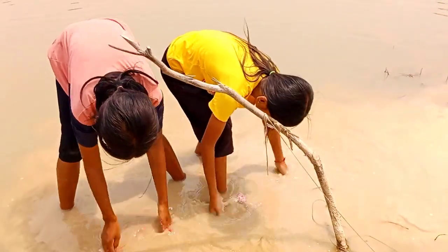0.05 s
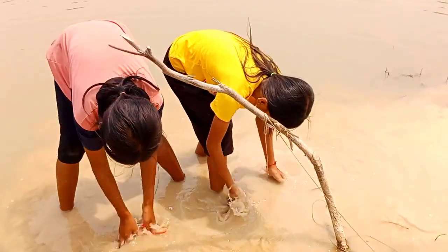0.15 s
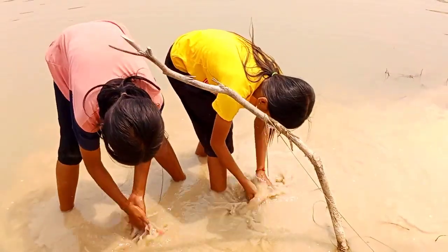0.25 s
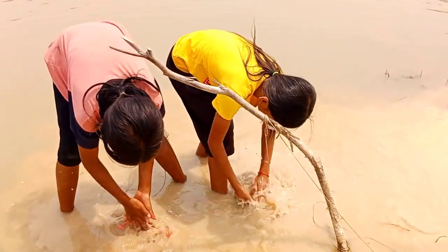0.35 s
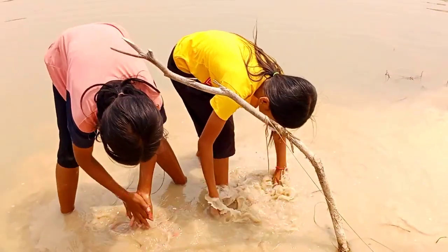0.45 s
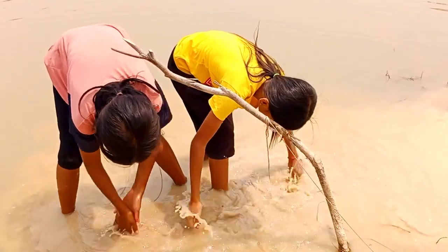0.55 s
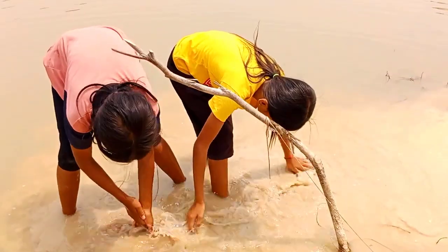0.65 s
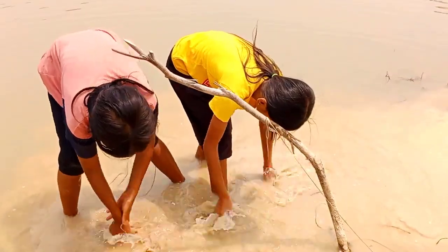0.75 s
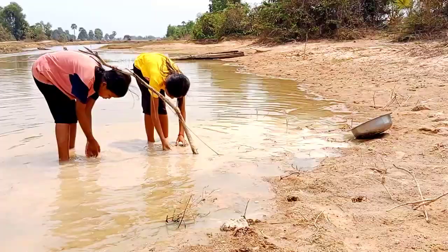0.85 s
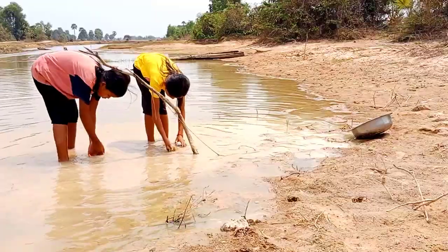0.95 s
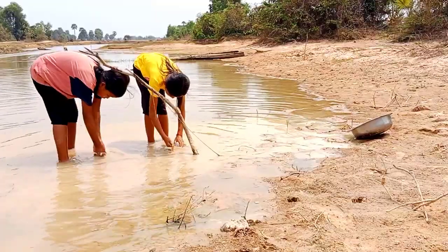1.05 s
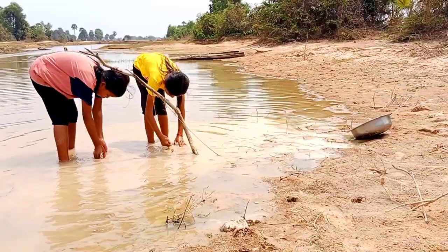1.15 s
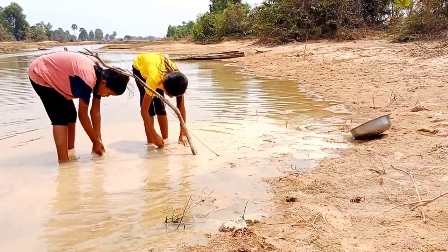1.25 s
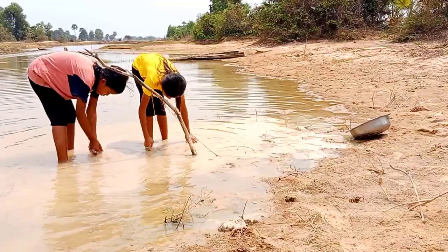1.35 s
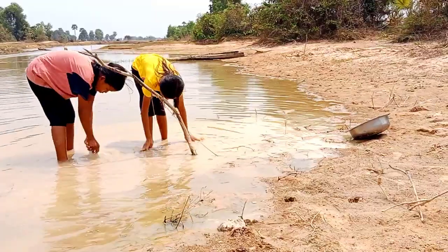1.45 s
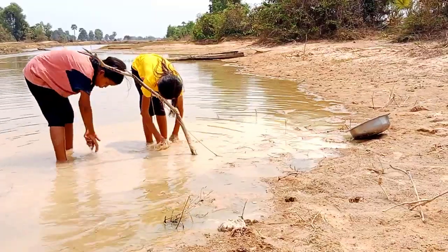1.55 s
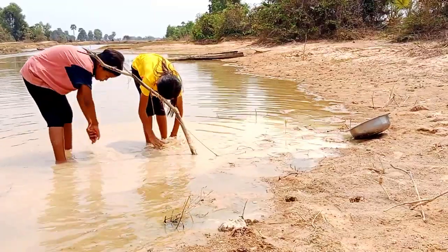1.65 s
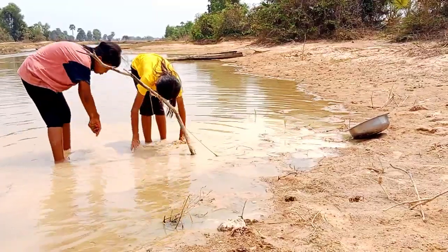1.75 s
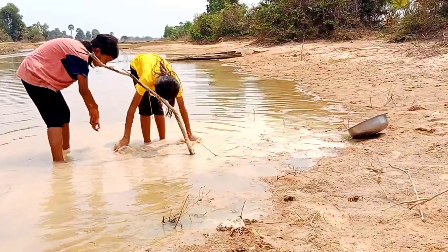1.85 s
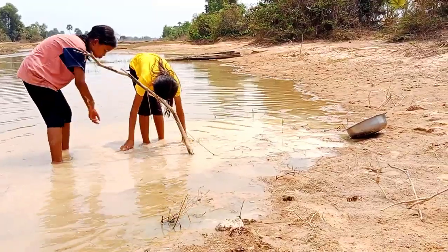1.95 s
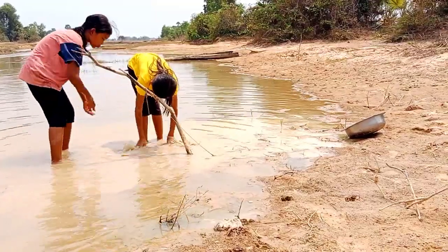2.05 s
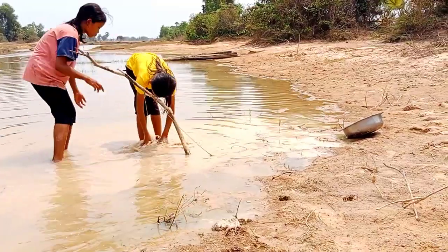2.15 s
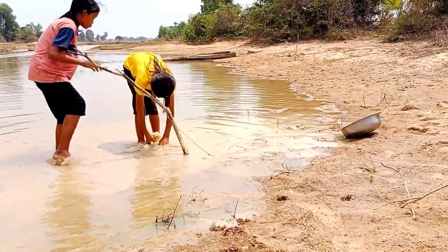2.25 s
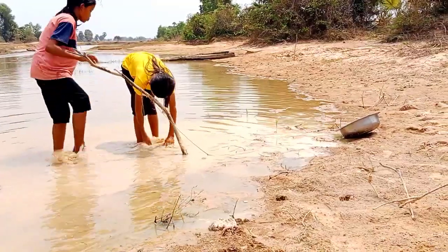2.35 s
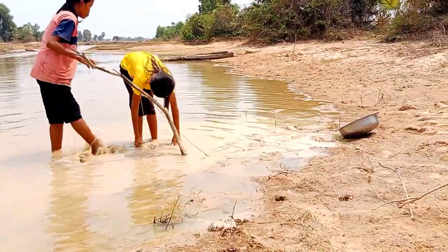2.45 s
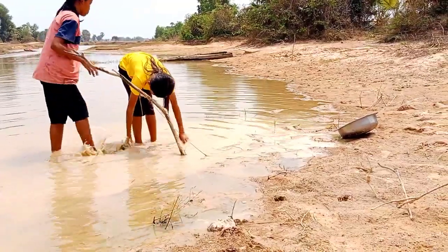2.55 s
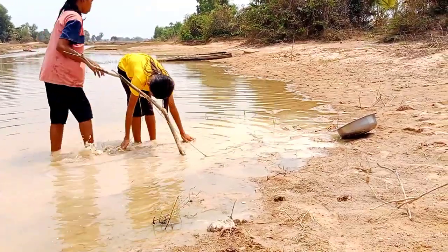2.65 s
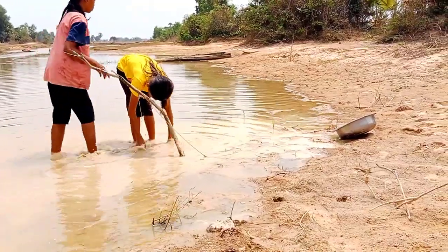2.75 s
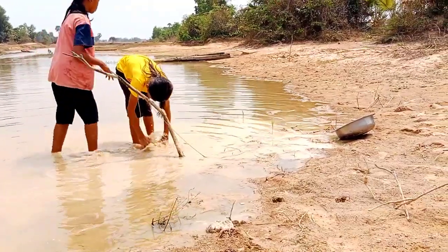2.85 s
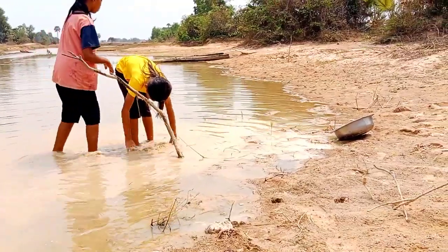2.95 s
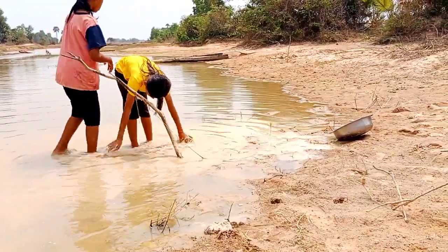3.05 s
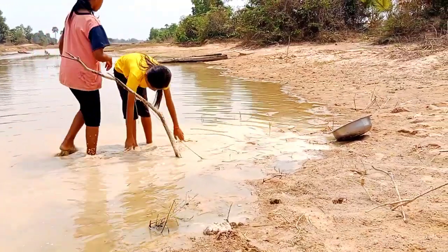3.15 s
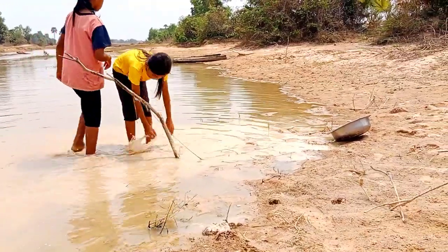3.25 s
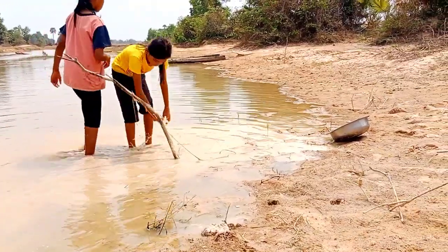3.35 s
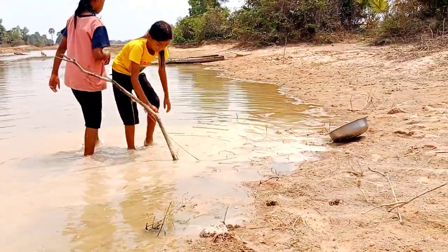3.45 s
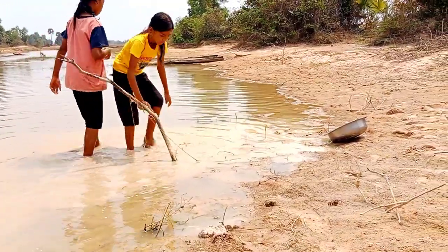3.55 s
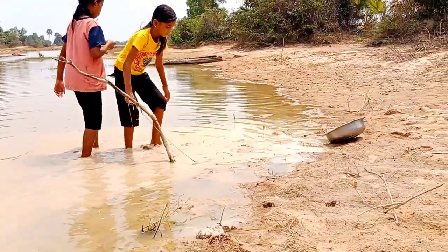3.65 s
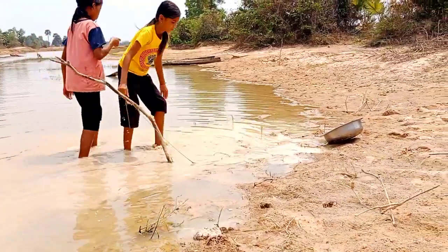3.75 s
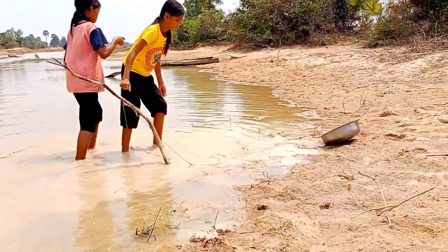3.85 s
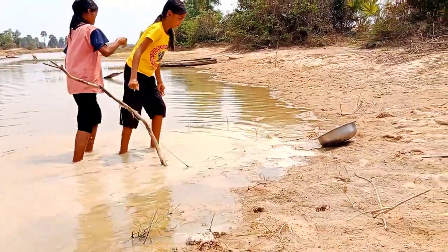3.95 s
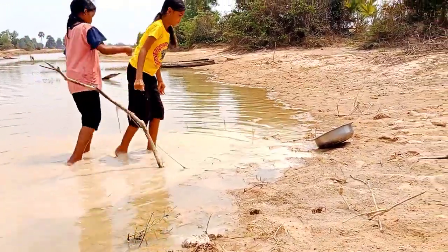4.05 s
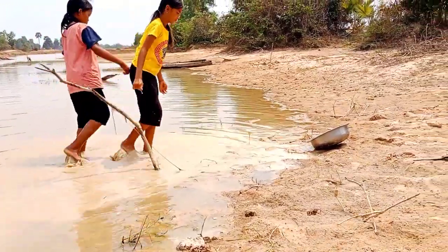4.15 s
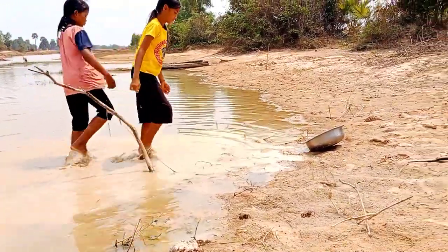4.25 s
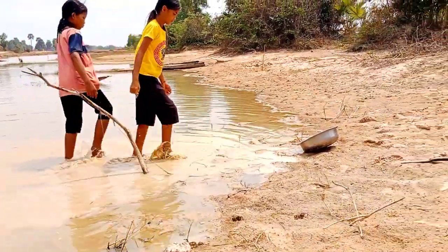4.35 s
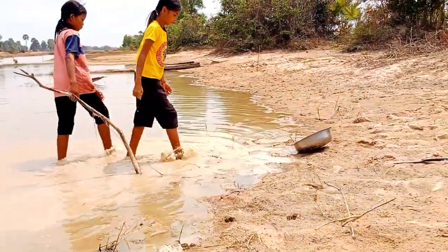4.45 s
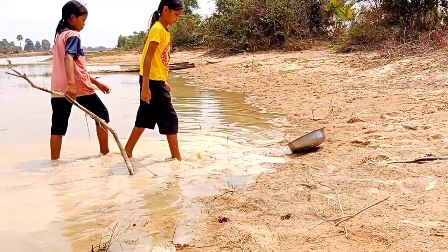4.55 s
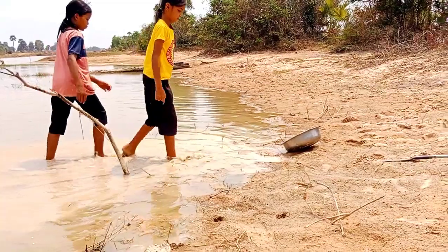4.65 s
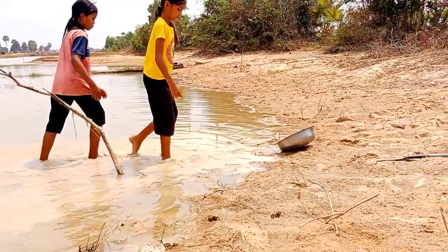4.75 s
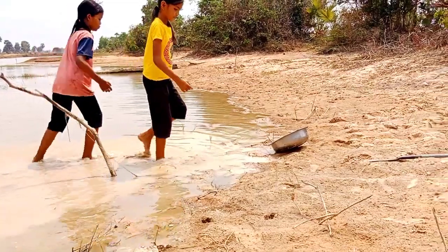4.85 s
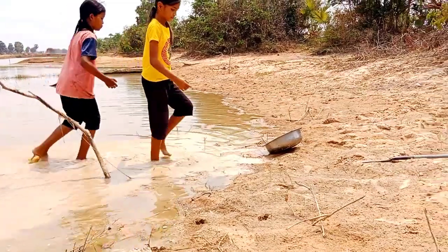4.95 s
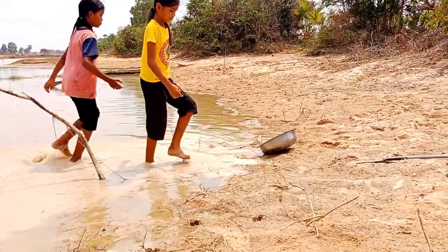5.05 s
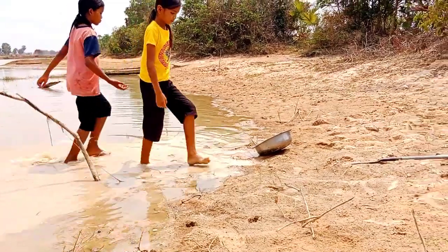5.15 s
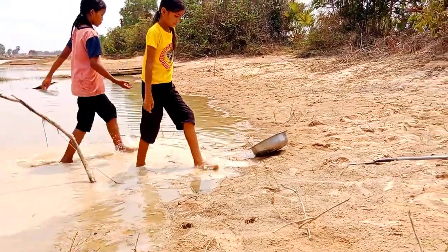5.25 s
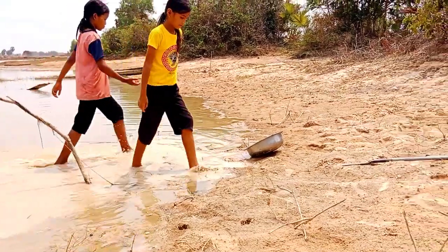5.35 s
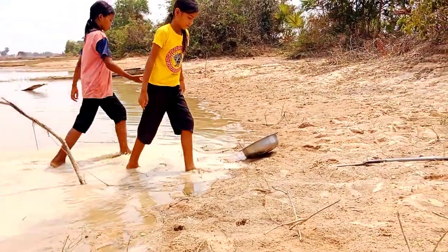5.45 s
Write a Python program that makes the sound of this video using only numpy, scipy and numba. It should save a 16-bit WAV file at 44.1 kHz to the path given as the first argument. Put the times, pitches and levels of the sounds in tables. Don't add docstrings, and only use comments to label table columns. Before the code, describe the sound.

Close bubbly splashing stops dead, then quieter sloshing around shifting feet, abrupt wind bumps on the microphone and a few watery steps.

```python
import sys
import numpy as np
from scipy import signal
from scipy.fft import rfft, irfft, next_fast_len
from scipy.io import wavfile
from scipy.ndimage import uniform_filter1d
from numba import njit

SR = 44100
rng = np.random.default_rng(int(sys.argv[2]) if len(sys.argv) > 2 else 0)


def unload_wav(signal):
    wavfile.write(
        sys.argv[1],
        SR,
        np.round(np.clip(np.atleast_2d(signal).T, -1, 1) * 32767).astype(np.int16),
    )


def to_linear_factor(level_db):
    exponent = np.asarray(level_db, float) / 20
    return 10 ** exponent


N = 243278
T = np.arange(N) / SR

# start in seconds, end in seconds.
SILENCE_S = (.8605, .955)

# frequency in Hz, level in dB per Hz.
AIR_COLOUR = [(18, -26.5), (30, 1), (140, -2.5), (210, -21.5), (360, -14.5), (1220, -25), (3580, -25),
              (11700, -38), (16000, -45)]

# frequency in Hz, level in dB per Hz.
WATER_COLOUR = [(280, -29), (400, -17), (600, -4.5), (1170, 4.5), (2200, -6), (3800, -15), (3980, -28.5),
                (4500, -28), (4850, -39), (5500, -24), (7400, -13), (9300, -16.5), (10500, -19.5),
                (13500, -22), (15300, -25.5)]
# peak time in seconds, peak level in dB, rise in seconds per 20 dB,
# fall in seconds per 20 dB, spray in dB above slosh.
SCOOPS = [(0.02, -57.5, 0.12, 0.06, -5.5), (0.071, -36, 0.015, 0.011, -17.5),
          (0.082, -19.5, 0.0042, 0.046, -13.5), (.135, -50, .03, 0.065, -8),
          (0.228, -17, 0.0095, 0.12, -20), (0.311, -18.5, 0.059, 0.085, -8),
          (0.353, -16, 0.13, 0.027, -20.5), (0.413, -25.5, 0.012, 0.081, -13), (.46, -25, .1, 0.12, -8.5),
          (0.669, -24.5, 0.17, 0.034, -10), (.74, -26, 0.033, 0.11, -2), (.81, -24, 0.21, 0.045, -10.5),
          (0.859, -21, 0.056, 0.014, -9)]
SLOSHES = [(1.304, -55.5, 0.0055, 0.15, -10.5), (1.5, -73, 0.24, 0.048, -5.5),
           (1.546, -47.5, 0.079, 0.18, -9.5), (1.804, -38, 0.16, 0.18, -14.5),
           (1.909, -33.5, 0.053, 0.044, -15.5), (2.034, -43, 0.066, 0.054, -9),
           (2.148, -50, 0.0025, 0.38, -8.5), (2.24, -40, 0.072, 0.18, -33),
           (2.39, -45.5, 0.39, 0.065, -22.5), (2.444, -28, 0.011, 0.14, -23.5),
           (2.489, -16, 0.038, 0.099, -19.5), (2.521, -17, 0.064, 0.12, -15.5),
           (2.68, -38.5, 0.35, 0.13, -15.5), (2.739, -38, 0.061, 0.086, -9),
           (2.795, -36.5, 0.14, 0.044, -20), (2.896, -43, 0.1, 0.31, -42), (2.962, -41.5, 0.08, 0.13, -8.5),
           (3.168, -38.5, 0.062, 0.11, -8.5), (3.285, -53, 0.037, 0.17, -7.5),
           (3.489, -43.5, 0.0037, 0.11, -24.5), (3.533, -48.5, 0.073, 0.018, -14.5),
           (3.657, -42, 0.024, 0.039, -15), (3.714, -50, 0.082, 0.11, -13.5),
           (3.83, -52, 0.085, 0.092, -24)]
STRIDES = [(4.107, -53, 0.051, 0.022, -16), (4.15, -68.5, 0.05, 0.066, -4),
           (4.365, -36.5, 0.098, 0.11, -16.5), (4.461, -40, 0.25, 0.19, -10.5),
           (4.51, -33, 0.068, 0.074, -9.5), (4.631, -32, 0.15, 0.043, -11.5), (4.74, -56, 0.1, 0.071, -30),
           (4.802, -49.5, 0.084, 0.048, -15.5), (4.992, -33, 0.0019, 0.2, -15.5),
           (5.032, -29.5, 0.031, 0.017, -18), (5.15, -46.5, 0.097, 0.43, -14),
           (5.202, -43.5, 0.034, 0.1, -1.5), (5.33, -48, 0.48, 0.52, -6), (5.448, -60, 0.55, 0.19, 6)]
# time in seconds, gurgle in dB above slosh.
DEPTH = [(.128, -28), (.29, 1.8), (.41, -13), (.554, 0), (.73, -9.5), (.86, 1.5), (1.4, -26), (1.66, -8.5),
         (1.8, -17), (2.41, -18.5), (2.44, 6), (2.7, -19.5), (3.45, -19.5), (3.52, -7), (4.6, -4),
         (4.75, -28), (5.03, -7.5), (5.2, -16)]
FIZZ_DB = (-2.5, -1.5, 1)
# time in seconds, depth in dB.
CLAMPS = [
    (.358, -10),
    (1.849, -10.5),
    (1.908, -16),
    (2.048, -14),
    (2.306, -12),
    (3.249, -8.5),
    (4.105, -1.5),
    (5.085, -12),
]

# start in seconds, peak level in dB, pitch in Hz, ring time in cycles,
# pitch rise from 0 to 1.
BUBBLES = [(0.033, -44.5, 643, 13, 0), (0.066, -36.5, 647, 15, 0.17), (0.084, -11, 1394, 6.4, 0),
           (0.094, -23.5, 661, 10.4, 0.27), (0.117, -19.5, 1357, 7.9, 0.34), (0.229, -12, 916, 12, 0),
           (0.236, -9.5, 1136, 20, 0.05), (0.287, -17, 1620, 7.9, 0.4), (0.3, -6.5, 392, 9.7, 0.02),
           (0.321, -4.5, 1520, 7.9, 0.14), (0.341, 1, 952, 6.4, 0.33), (0.577, -21.5, 336.4, 13, 0.14),
           (0.612, -27, 415, 14, 0.44), (0.137, -33, 1060, 15, 0.7), (0.005, -55, 640, 14, 0.05),
           (0.638, -21, 596, 7.2, 0.08), (0.752, -21, 956, 6, 0), (0.851, -9.5, 990, 7.6, 0.06)]
FOOT_BUBBLES = [(1.576, -42.5, 564, 16, 0.15), (1.6, -38, 1070, 9.4, 0.06), (1.693, -48, 594, 17, 0),
                (1.81, -16, 1167, 7, 0), (1.835, -23.5, 1470, 9, 0), (2.225, -30.5, 1088, 26, 0.15),
                (2.261, -34, 1090, 13, 0.02), (2.439, -17, 455, 9.2, 0.15), (2.461, -12, 615, 6.9, 0.03),
                (2.473, -6.5, 1013, 18, 0.15), (2.488, -8, 1192, 22, 0.16), (2.508, -15, 1303, 17, 0.41),
                (2.543, -6, 550, 6.6, 0.04), (2.74, -21, 1160, 10.3, 0.02), (2.783, -18, 956, 10, 0.15),
                (2.875, -26, 763, 10.6, 0.03), (3.153, -24.5, 1200, 14.6, 0.19),
                (3.495, -28, 1180, 4.3, 0.08), (3.524, -27, 1182, 8.3, 0.24), (3.708, -32, 1450, 8.7, 0.02),
                (3.804, -42, 796, 11, 0), (3.9, -57.5, 1150, 110, 0.05), (4.124, -54.5, 1150, 45, 0.03),
                (4.15, -55, 900, 34, 0.03), (4.193, -45, 790, 36, 0.19), (4.24, -55.5, 600, 38, 0),
                (4.725, -48, 1200, 35, 0.1), (4.746, -44, 1380, 23, 0.1), (4.763, -44, 1180, 14, 0.03),
                (4.785, -45, 1150, 27, 0.02), (4.895, -62.5, 1200, 38.2, 0.2),
                (4.501, -13.5, 1098, 8, 0.09), (4.55, -28, 549, 13, 0.05), (4.617, -28, 1180, 5.9, 0.6),
                (4.995, -24.5, 1176, 29, 0.3), (5.02, -20, 625, 9.7, 0.01), (5.329, -38.5, 877, 13, 0.06)]
# start in seconds, peak level in dB.
SMACKS = [(.025, -46), (.036, -51), (.08, -21.5), (.411, -26.5), (.463, -26), (.5375, -29), (.579, -17.5),
          (.72, -33.5), (.801, -21.5), (.848, -16.5), (1.883, -34), (3.65, -43.5), (4.105, -27.5),
          (4.618, -30.5), (4.774, -49.5), (4.797, -52.5), (5.361, -44.5)]
# start in seconds, peak level in dB.
DROPS = [(0.0368, -37), (0.0722, -29), (0.0832, -23.5), (0.0899, -13.5), (0.2119, -27.5), (0.2793, -15),
         (0.3247, -10.5), (0.4424, -19), (0.5023, -23), (0.5931, -24), (0.6419, -25), (0.1092, -14),
         (0.232, -15.5), (0.2996, -7), (0.3418, -12.5), (0.423, -23.5), (0.4823, -18.5), (0.5275, -18),
         (0.7036, -21), (0.7344, -10), (0.847, -6), (1.2995, -38.5), (1.8856, -32), (2.1603, -23),
         (1.7963, -38), (1.8287, -44), (2.2578, -46.5), (2.305, -45.5), (2.4543, -34.5), (2.4708, -29),
         (2.4897, -25), (2.6369, -32), (2.9322, -37.5), (2.5233, -19.5), (2.578, -27), (2.6925, -21.5),
         (2.9572, -31.5), (3.1625, -31), (3.31, -46), (3.545, -47.5), (3.6617, -35), (3.722, -50),
         (4.1055, -36), (4.1399, -44.5), (4.165, -50), (4.178, -43), (4.4253, -40), (4.4967, -33),
         (4.565, -32), (4.6314, -18.5), (4.6364, -19.5), (4.657, -32.5), (5.2001, -24), (5.361, -36)]
# start in seconds, peak level in dB, pitch in Hz.
SCOOP_PLIPS = [(0.088, -30, 2470), (0.089, -33.5, 4020), (0.18, -41, 1722), (0.235, -27.0, 2320),
               (0.237, -34, 2880), (0.246, -19, 1960), (0.266, -23.5, 2480), (0.29, -12.5, 1630),
               (0.299, -33, 2487), (0.302, -12, 1226), (0.332, -13, 1870), (0.341, -32, 3890),
               (0.343, -6.5, 1347), (0.417, -26, 1900), (0.421, -22.5, 936), (0.454, -31, 3400),
               (0.478, -22.5, 2140), (0.48, -30, 1700), (0.535, -30.5, 1894), (0.58, -28, 2290),
               (0.719, -22, 2300), (0.725, -21.5, 1570), (0.789, -19.5, 1870), (0.817, -17.5, 960),
               (0.845, -32, 2454), (0.855, -19.5, 696), ]
FOOT_PLIPS = [(1.434, -52.5, 1160), (1.82, -37.5, 2250), (1.842, -43.5, 436), (1.881, -37, 1230),
              (1.885, -32, 985), (1.896, -31, 1510), (1.899, -35, 1810), (1.986, -52.5, 1250),
              (2.148, -39.5, 1260), (2.16, -41, 1190), (2.197, -35, 1119.0), (2.223, -31.5, 860),
              (2.482, -13, 610), (2.485, -32, 3030), (2.49, -27, 2400), (2.501, -30.5, 2770),
              (2.508, -17, 2000), (2.513, -15, 1230), (2.52, -21, 856), (2.529, -17, 1130),
              (2.535, -36, 2920), (2.581, -34, 1528), (2.691, -45, 2430), (2.693, -36, 1990),
              (2.89, -32, 1335), (2.933, -34, 1008), (2.957, -36, 1188), (3.016, -38.5, 2100),
              (3.113, -44.5, 1180), (3.153, -35.5, 1690), (3.182, -40.5, 2497.0), (3.22, -40.5, 1670),
              (3.282, -46.5, 1464.0),
              (3.5, -47.5, 1894.0), (3.582, -48.5, 1200), (3.653, -32, 1220), (3.71, -49.5, 1993),
              (4.103, -40.5, 432), (4.108, -40, 1290), (4.058, -53, 5940), (4.424, -31, 904.0),
              (4.5, -30, 1510), (4.517, -30.5, 2450), (4.616, -27, 1330), (4.617, -31.3, 1630),
              (4.623, -37, 2290), (4.637, -33, 1981.0), (4.773, -48, 3100), (4.774, -48, 2770),
              (4.796, -43.5, 1982), (5.0, -43, 3675), (5.006, -27, 2180), (5.011, -24, 1050),
              (5.015, -38, 3480), (5.027, -35.5, 2830), (5.073, -36.3, 1170), (5.151, -41, 1460),
              (5.19, -40.5, 900), (5.198, -37.5, 1670), (5.198, -39, 3400), (5.202, -38, 2080),
              (5.264, -42, 2583.0), (5.343, -40.5, 896), (5.509, -42, 1210)]

# frequency in Hz, level in dB per Hz.
WIND_COLOUR = [(15, -46), (40, -19.5), (70, 5.5), (110, 4), (150, 0.5), (200, -23.5), (260, -31),
               (340, -45.5)]
# time in seconds, level in dB.
BREEZE = [(0.0, -71), (.27, -66.5), (.7, -56.5), (.955, -84.5), (1.45, -74), (1.9, -55.5), (2.12, -66),
          (3.1, -77.5), (3.27, -52), (3.4, -70), (3.75, -59.5), (4.9, -64.5), (5.5, -63.5)]
# peak time in seconds, level in dB, rise and fall in seconds per 20 dB.
PUFFS = [(.35, -48.5, 0.13, 0.03), (0.741, -42.5, 0.039, 0.14), (1.548, -36.5, 0.02, 0.037),
         (1.837, -6.5, 0.021, 0.0094), (2.152, -17, 0.0079, 0.022), (2.2, -24, 0.011, 0.022),
         (2.535, -27.5, 0.086, 0.26), (2.7, -55, .011, 0.11), (2.9, -50.5, .011, 0.11),
         (3.121, -17, 0.0019, 0.053), (3.521, -42, 0.11, 0.045), (3.84, -42, 0.16, 0.13),
         (3.944, -31, 0.026, 0.015), (3.975, -27, 0.024, 0.018), (4.111, -37.5, .004, 0.051),
         (4.498, -36, .23, 0.074), (4.62, -31.5, 0.19, 0.023), (4.675, -41.5, 0.013, 0.061),
         (4.743, -32.5, 0.022, 0.011), (5.018, -17, 0.014, 0.02), (5.195, -37, 0.11, 0.046),
         (5.329, -48, 0.56, 0.59), (5.442, -30.5, 0.022, 0.031), (5.492, -36.5, 0.027, 0.083)]
# end in seconds, level in dB, rise in seconds per 20 dB, hold in seconds.
GUSTS = [(1.848, -21, 0.029, 0.081), (1.886, -16.5, 0.0098, 0.011), (2.043, -35.5, 0.026, 0.017),
         (2.309, -35.5, 0.017, 0.072), (2.684, -20.5, 0.022, 0.058), (2.888, -15.5, 0.009, 0.014),
         (3.244, -28.5, 0.061, 0.0016), (3.37, -34.5, 0.016, 0.046), (3.669, -29, 0.0064, 0.014),
         (4.103, -4, 0.051, .002), (4.661, -24.5, 0.013, 0.032), (5.084, -24, 0.045, 0.0018)]
# peak time in seconds, level in dB, rise and fall in seconds per 20 dB.
BUFFETS = [
    (1.81, -31.5, 0.099, 0.074),
    (2.5, -39, 0.03, 0.15),
    (3.122, -27.5, 0.0052, 0.05),
    (3.17, -37.5, 0.033, .03),
    (2.16, -43, 0.0068, 0.023),
    (4.097, -22, 0.036, .008),
]
# start in seconds, end in seconds, start pitch in Hz, end pitch in Hz, level in dB.
BIRDS = [(1.07, 1.112, 3730, 3090, -74), (1.137, 1.186, 3910, 3400, -72), (1.18, 1.232, 3165, 2900, -71),
         (3.306, 3.318, 5900, 5300, -66.5), (3.516, 3.55, 5850, 5330, -67), (3.726, 3.782, 5880, 5300, -74),
         (3.906, 4.005, 2716, 2660, -68.5), (3.948, 3.974, 10000, 9850, -70),
         (4.045, 4.13, 3690, 3600, -63.5), (4.13, 4.272, 3640, 3430, -69),
         (4.263, 4.322, 4150, 3290, -63.5), (4.669, 4.788, 2810, 2956, -68),
         (4.776, 4.975, 3660, 3620, -66.5), (3.812, 3.881, 3550, 3615, -75.5)]


def curve(table, column):
    rows = np.array(table)
    return np.interp(T, np.maximum.accumulate(rows[:, 0]), rows[:, column])


def colour(x, points, lo_hz=0, hi_hz=SR):
    size = next_fast_len(N + 8192)
    hz = np.maximum(np.arange(size // 2 + 1) * SR / size, 1)
    point_hz, point_db = np.array(points).T
    db = np.interp(np.log(hz), np.log(point_hz), point_db)
    db = db - 10 * np.log10(1 + (lo_hz / hz) ** 8) - 10 * np.log10(1 + (hz / hi_hz) ** 8)
    cepstrum = irfft(np.log(to_linear_factor(np.maximum(db, -140))), size)
    cepstrum[1:size // 2] *= 2
    cepstrum[size // 2 + 1:] = 0
    y = irfft(rfft(x, size) * np.exp(rfft(cepstrum)), size)[:N]
    return y / y.std()


def walk(rate):
    k = int(SR / rate)
    held = np.repeat(rng.standard_normal(N // k + 1), k)
    w = uniform_filter1d(uniform_filter1d(held, k), k)[:N]
    return w / w.std()


def bursts(peak_s, db, rise_s, fall_s, floor_db, hold_s=0.):
    coarse = T[::16]
    late = coarse - peak_s[:, None]
    rise_slope = 20 / np.maximum(rise_s, .001)[:, None]
    fall_slope = 20 / np.maximum(fall_s, .001)[:, None]
    early = np.maximum(-late - np.reshape(hold_s, (-1, 1)), 0)
    drop = fall_slope * np.maximum(late, 0) + rise_slope * early
    power = (to_linear_factor(db[:, None] - drop) ** 2).sum(axis=0)
    return 10 * np.log10(np.interp(T, coarse, power) + to_linear_factor(floor_db) ** 2)


def open_air():
    return to_linear_factor(-70 + 0.45 * walk(18)) * colour(rng.standard_normal(N), AIR_COLOUR, 130)


@njit
def ring(start, hz, cycles, rise, size, soft):
    out = np.zeros(N)
    for k in range(len(start)):
        span, phase = cycles[k] * SR / hz[k], 0.
        for j in range(min(int(5 * span), N - start[k])):
            phase += 2 * np.pi * min(hz[k] * (1 + rise[k] * j / span), 19000.) / SR
            swell = (1 - np.exp(-j / (soft * span))) ** 2
            out[start[k] + j] += size[k] * np.exp(-j / span) * swell * np.sin(phase)
    return out


def swarm(lo_hz, hi_hz, cycles, rise, scatter_db, count):
    when, pitch, life, luck = rng.random((count, 4)).T
    start = (when * N).astype(np.int64)
    hz = lo_hz * (hi_hz / lo_hz) ** pitch
    size = to_linear_factor(-scatter_db * np.log(1 - .995 * luck)) * np.sqrt(hz / lo_hz)
    x = ring(start, hz, cycles * (.5 + life), rise * life, size, .13)
    return x / x.std()


def stirring():
    trickle_db, trickle_spray_db = -82, 2.5
    let_go_s = 0.055
    s, db, rise, fall, spray = np.transpose(SCOOPS + SLOSHES + STRIDES)
    fizz = 0.74 * spray + np.repeat(FIZZ_DB, [len(SCOOPS), len(SLOSHES), len(STRIDES)])
    duck = sum(depth * (T >= at) * np.exp(-np.abs(T - at) / let_go_s) for at, depth in CLAMPS)
    fall = np.where(s < SILENCE_S[0], np.minimum(fall, (SILENCE_S[1] - s) / 3), fall)
    slosh_db = bursts(s, db, rise, fall, trickle_db)
    spray_db = bursts(s, db + spray, rise, 0.99 * fall, trickle_db + trickle_spray_db)
    fizz_db = bursts(s, db + fizz, rise, fall, trickle_db)
    return duck + np.array([slosh_db, spray_db, fizz_db])


def water():
    gurgle = swarm(380, 900, 6.1, .06, 0.98, count=1400) + to_linear_factor(-9.0) * rng.standard_normal(N)
    slosh = swarm(900, 2100, 4.6, 0.14, 1.3, count=4500) + to_linear_factor(-7) * rng.standard_normal(N)
    fizz = swarm(2000, 4800, 7.5, 0.06, 1.9, count=5000) + to_linear_factor(-2.5) * rng.standard_normal(N)
    spray = swarm(5000, 15500, 4.9, 0.051, 3.8, count=12000) + rng.standard_normal(N)
    slosh_db, spray_db, fizz_db = stirring()
    gurgle_db = slosh_db + curve(DEPTH, 1)
    gurgle = to_linear_factor(gurgle_db - 2.5 + 2.1 * walk(38)) * colour(gurgle, WATER_COLOUR, 350, 1100)
    slosh = to_linear_factor(slosh_db - 3.5 + 1.1 * walk(45)) * colour(slosh, WATER_COLOUR, 750, 2600)
    fizz = to_linear_factor(fizz_db + 0.34 + 0.42 * walk(45)) * colour(fizz, WATER_COLOUR, 1100, 5000)
    spray = to_linear_factor(spray_db - 1.5 + 2.8 * walk(60)) * colour(spray, WATER_COLOUR, 2700)
    close_db = spray_db - 15.5 - 6 * (T > SILENCE_S[0])
    close = to_linear_factor(close_db) * colour(rng.standard_normal(N), WATER_COLOUR[:1], 3700, 4800)
    return to_linear_factor(0.89 * walk(110)) * (gurgle + slosh + fizz + spray + close)


def bubbles():
    s, db, hz, cycles, rise = np.transpose(BUBBLES + FOOT_BUBBLES)
    start = (s * SR).astype(np.int64)
    return ring(start, hz, np.maximum(.45 * cycles, .5), .4 * rise, to_linear_factor(db + 3.5), .2)


def cracks(table, noise, decay_s, lo_hz, gain_db):
    out, tail = np.zeros(N + 800), np.exp(-np.arange(800) / (decay_s * SR))
    for s, db in table:
        first = int(s * SR)
        out[first:first + 800] += to_linear_factor(db) * tail
    return colour(out[:N] * noise, WATER_COLOUR, lo_hz) * to_linear_factor(gain_db) * out.std()


def drops():
    noise = rng.standard_normal(N)
    smacks = cracks(SMACKS, 1 + noise, decay_s=0.0006, lo_hz=440, gain_db=2.5)
    return smacks + cracks(DROPS, noise, decay_s=0.001, lo_hz=4900, gain_db=-6.5)


def plips():
    s, db, hz = np.transpose(SCOOP_PLIPS + FOOT_PLIPS)
    ring_s = .0034 * (hz / 1000) ** -0.34
    rise = np.full(len(hz), 0.014)
    return ring((s * SR).astype(np.int64), hz, ring_s * hz, rise, to_linear_factor(db + 7), .25)


def blowing():
    end, db, rise, hold = np.transpose(GUSTS)
    shut_s = np.full(len(end), 0.0021)
    puffs_db = bursts(*np.transpose(PUFFS), curve(BREEZE, 1))
    return bursts(end, db, rise, shut_s, puffs_db, hold)


def wind():
    eddies = signal.hilbert(colour(rng.standard_normal(N), WIND_COLOUR))
    even = eddies.real / (np.abs(eddies) + .3) ** .6
    gust = to_linear_factor(blowing() - 3.5)
    gust = np.minimum(gust, uniform_filter1d(gust, size=301, origin=150))
    gust = uniform_filter1d(gust, size=70)
    rattle = colour(even, [(130, -24.5), (200, 14.5), (260, 15.0), (350, -12)], 180, 340)
    rattle = to_linear_factor(bursts(*np.transpose(BUFFETS), -95.5)) * rattle
    thump = gust * colour(even, [(20, -32.0), (55, -0.5), (260, 1.5), (380, -25.5)])
    return signal.sosfilt(signal.butter(2, 38, "high", fs=SR, output="sos"), thump + rattle)


def birds():
    out = np.zeros(N)
    flutter = to_linear_factor(3.5 * walk(120))
    waver = 1 + .008 * walk(250)
    for t0, t1, hz0, hz1, db in BIRDS:
        u = np.clip((T - t0) / (t1 - t0), 0, 1)
        phase = 2 * np.pi * np.cumsum(waver * (hz0 + (hz1 - hz0) * u)) / SR
        out += to_linear_factor(db) * np.sqrt(np.sin(np.pi * u ** 0.51)) * np.sin(phase)
    return out * flutter


def suppress(x, noise_db=-88, patchy_db=7.0, least_db=-16):
    hz, _, z = signal.stft(x, SR, nperseg=512, noverlap=384)
    power = uniform_filter1d(uniform_filter1d(np.abs(z) ** 2, size=3, axis=0), size=7, axis=1)
    pairs = np.arange(len(hz)) // 2
    patch = uniform_filter1d(rng.standard_normal(z.shape)[pairs], size=45, axis=1)
    patch = patchy_db * patch / patch.std()
    tilt_db = np.interp(hz, [300, 900, 1100, 2000, 5000, 15000], [3, 11, 5.5, 4.5, -6.5, -21.0])
    guess = to_linear_factor(noise_db + tilt_db[:, None] + patch) ** 2
    gain = 1 / (1 + (guess / (power + 1e-18)) ** 0.93)
    gain = np.maximum(gain, to_linear_factor(least_db)) * to_linear_factor(0.4 * patch)
    gain[hz < 250] = 1
    return signal.istft(z * gain, SR, nperseg=512, noverlap=384)[1][:N]


def scene():
    return (open_air() + water() + bubbles() + drops() + plips() + wind() + birds())[None]


def top_cut(x):
    return signal.sosfilt(signal.butter(12, 16860, fs=SR, output="sos"), x)


def record(dry):
    kept = np.where(T > SILENCE_S[0], np.clip((T - SILENCE_S[1]) * 60, 0, 1), 1.)
    clean = suppress(dry[0]) * kept
    rounded = clean / (1 + clean ** 6) ** (1 / 6)
    mix = signal.sosfilt(signal.ellip(8, .2, 70, 15600, fs=SR, output="sos"), rounded)
    return top_cut(mix[None])


dry = scene()
out = record(dry)
unload_wav(out)
```